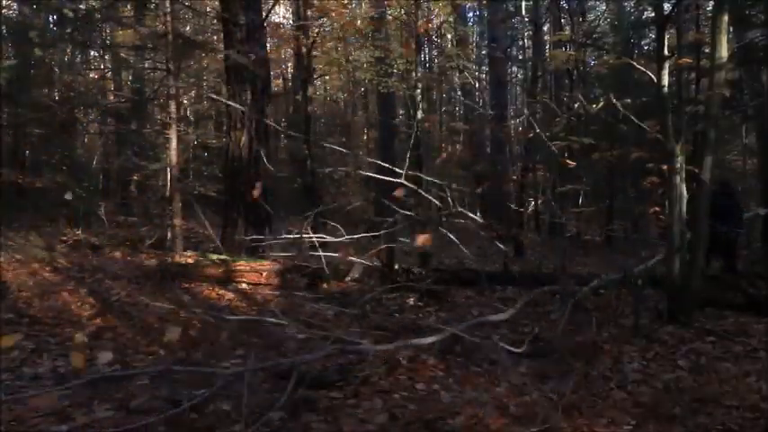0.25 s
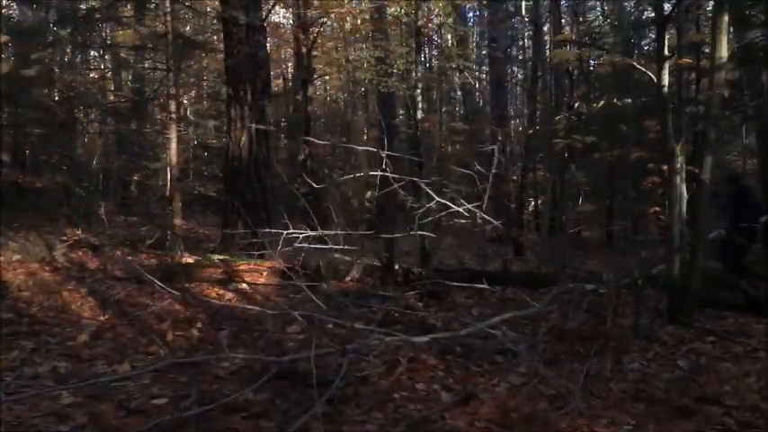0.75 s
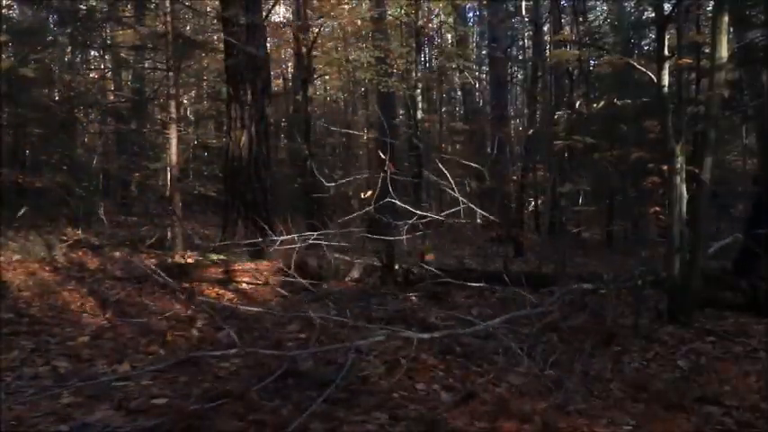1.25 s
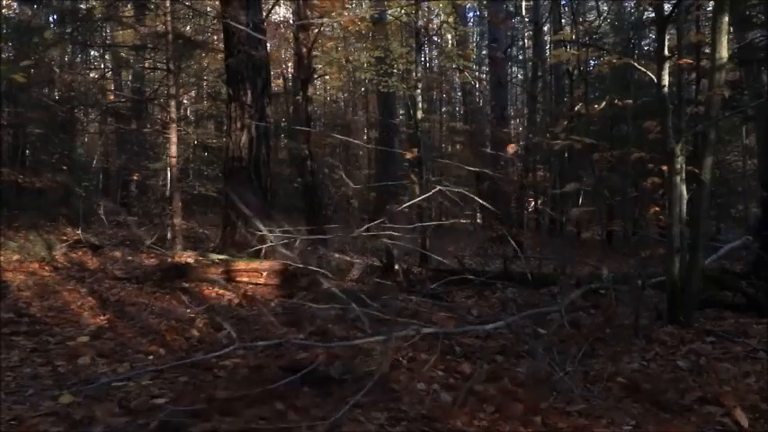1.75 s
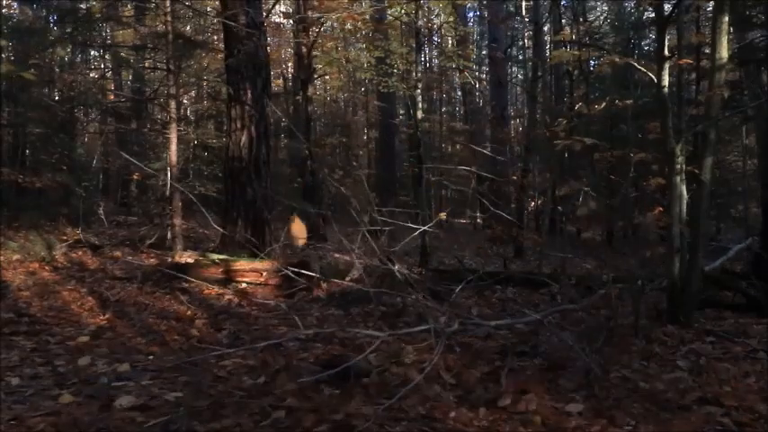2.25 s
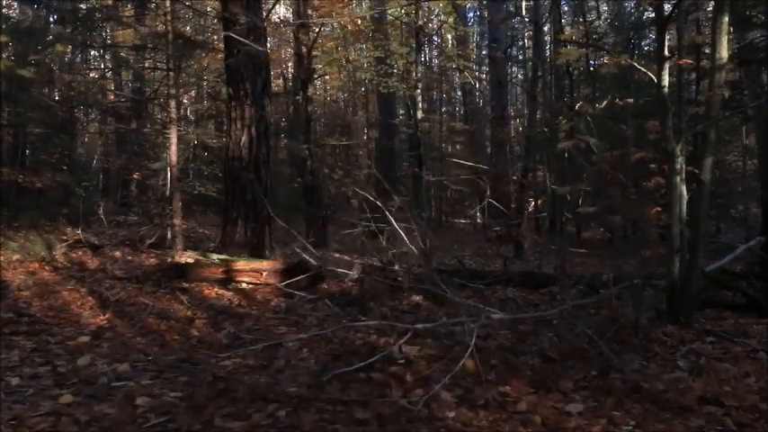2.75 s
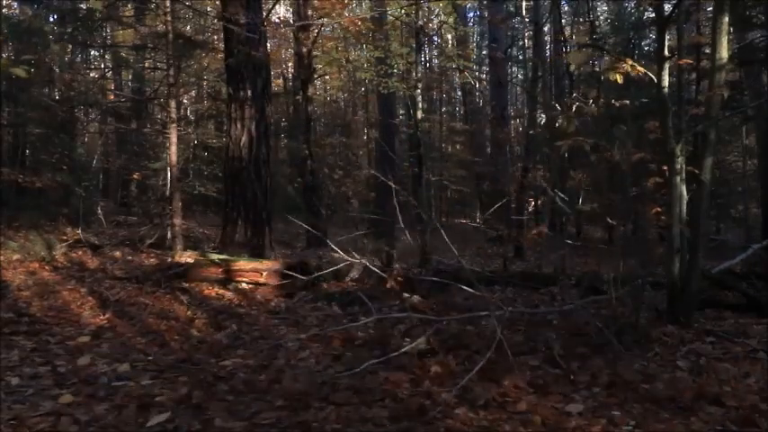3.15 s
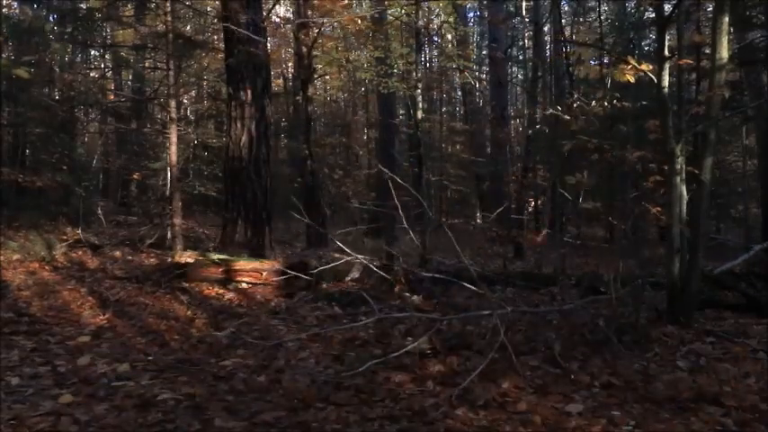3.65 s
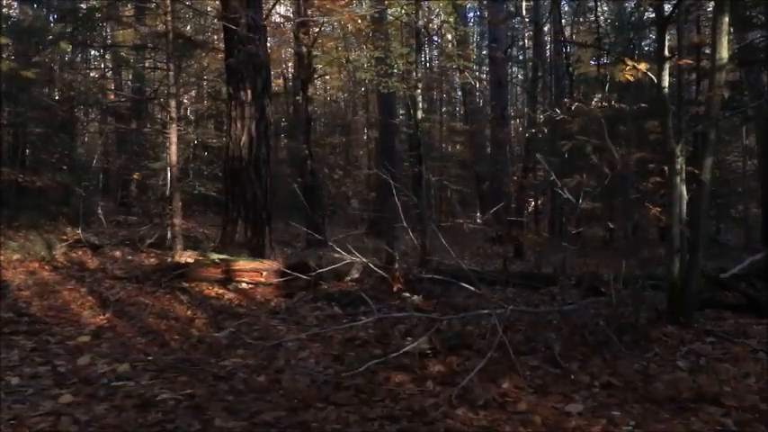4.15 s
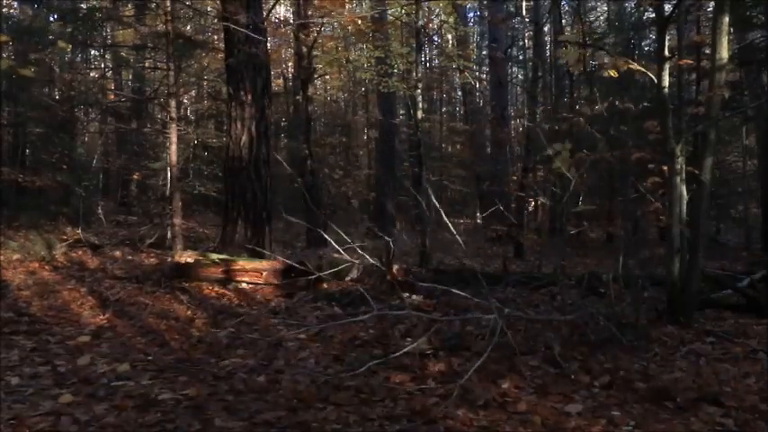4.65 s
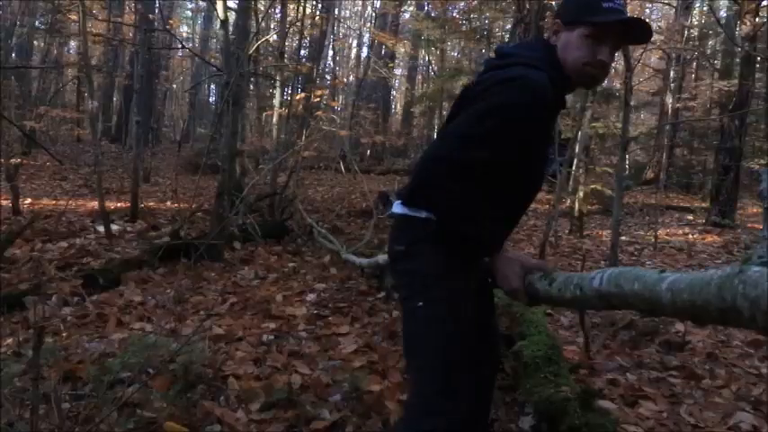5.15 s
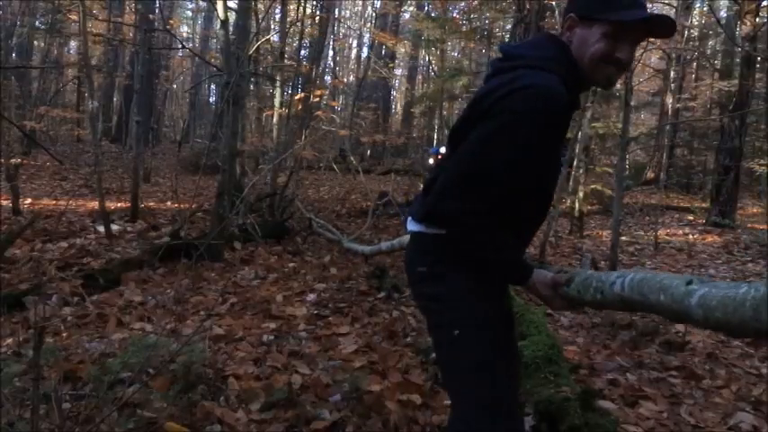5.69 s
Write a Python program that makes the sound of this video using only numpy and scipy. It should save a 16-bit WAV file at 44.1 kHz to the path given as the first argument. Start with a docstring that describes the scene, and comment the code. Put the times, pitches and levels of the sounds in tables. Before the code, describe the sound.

Dense leaf crackle and snapping twigs in a quiet wood fade, a branch crashes down, then close wood squeaks, knocks and snaps.

```python
"""Countless dry leaves crackle under a dragged branch in a quiet wood, with twigs snapping now and then.
After a lull the branch crashes into the litter and settles; then a log close by creaks, knocks and cracks.
Leaves are random clicks over filtered hiss, snaps are noise bursts through stick resonances, creaks are
stick-slip pulses through log modes, and thuds are decaying noise bands. Trunks echo the wood sounds faintly,
over a far murmur of filtered noise. Both channels carry the same mono sound."""
import sys
import numpy as np
from scipy import signal
from scipy.fft import rfft, irfft
from scipy.io import wavfile
from scipy.ndimage import uniform_filter1d

SR = 44100
rng = np.random.default_rng(int(sys.argv[2]) if len(sys.argv) > 2 else 0)


def log_audio(samples):
    """Write samples as a 16-bit WAV file to the path given in sys.argv[1]."""
    # one column per channel
    frames = np.atleast_2d(samples).T
    # limit to full scale, then quantise
    limited = np.clip(frames, -1, 1)
    pcm = np.round(limited * 32767).astype(np.int16)
    wavfile.write(sys.argv[1], SR, pcm)


N = 261072
T = np.arange(N) / SR  # time axis [s]
TOP_HZ = 15900  # upper limit of the sound and of the stick modes

# How hard the dragged branch stirs the litter, before the leaf trim: (time [s], level [dB])
DRAG_LEVEL = [(0, -41.5), (0.12, -43.5), (0.53, -39.5), (0.66, -41.5), (0.79, -46.5), (0.98, -52.0),
              (1.12, -47.5), (1.6, -46.0), (1.92, -40), (2.3, -46.5), (2.44, -43.5), (2.8, -46.0),
              (2.95, -42.5), (3.26, -45), (3.42, -52), (3.62, -58), (3.95, -63), (4.2, -57.5)]


def undb(db):
    """Decibels to gain."""
    return 10 ** (np.asarray(db) / 20)


def unit(x):
    """Scale to rms 1."""
    return x / np.sqrt(np.mean(x ** 2))


def level_curve(table):
    """Draw a (time [s], level [dB]) table as a level signal in dB."""
    times_s, levels_db = np.transpose(table)
    return np.interp(T, times_s, levels_db)


def add(out, start_s, x):
    """Mix x into out from the given time."""
    i = int(start_s * SR)
    out[i:i + len(x)] += x[:N - i]


def butter(x, hz, kind, order=2):
    """Low-, high- or band-pass, with corners kept safely below half the sample rate."""
    corners_hz = np.minimum(hz, SR / 2 - 1000)
    return signal.sosfilt(signal.butter(order, corners_hz, kind, fs=SR, output="sos"), x)


def ring(x, hz, width_hz):
    """One resonance, gain 1 at its centre."""
    return signal.lfilter(*signal.iirpeak(hz, hz / width_hz, fs=SR), x)


def colour(x, points, size=8192):
    """Causal minimum-phase filter with the given (Hz, dB) shape that keeps the power of white noise."""
    hz, db = np.transpose(points)
    bins_hz = np.arange(size // 2 + 1) * SR / size
    gain = unit(undb(np.interp(np.log(bins_hz + 1), np.log(hz), db)))
    # folding the cepstrum forward in time makes the filter causal
    cepstrum = irfft(np.log(gain))
    cepstrum[1:size // 2] *= 2
    cepstrum[size // 2 + 1:] = 0
    impulse = irfft(np.exp(rfft(cepstrum)))
    return signal.fftconvolve(x, impulse)[:len(x)]


def walk(rate_hz):
    """Smooth random wander with rms 1."""
    hold = int(SR / rate_hz)
    steps = np.repeat(rng.standard_normal(N // hold + 1), hold)
    return unit(uniform_filter1d(steps, hold)[:N])


def air():
    """The far murmur of the wood: coloured noise, swelling a little."""
    # Spectrum of the murmur: (frequency [Hz], relative density [dB])
    air_colour = [(12, -26), (20, -10.5), (68, -18.5), (101, -2), (127, -7.5), (158, -3), (193, -6.5),
                  (513, -7), (1480, -8.5), (1610, -14), (2260, -12), (2460, -14), (8650, -25.5),
                  (16000, -45)]
    level_db = -62 + 0.82 * walk(3.52)
    return colour(rng.standard_normal(N), air_colour) * undb(level_db)


def trunks(x, t60_s=0.99, dull_hz=4500, size=33000):
    """Trees scatter sound into a dull echo: convolution with decaying, low-passed noise of unit energy."""
    decay = np.exp(-np.log(1000) * T[:size] / t60_s)
    echo = butter(rng.standard_normal(size), dull_hz, "lowpass", order=1) * decay
    return signal.fftconvolve(x, echo / np.sqrt(np.sum(echo ** 2)))[:N]


def crackle(rate, spread_db, patchy_db, hiss_db, crisp_db, bands=9):
    """Tiny leaf fractures (rate per second) of random size over sliding hiss, each band wavering by itself."""
    size_db = spread_db * np.minimum(rng.exponential(size=N), 4)
    clicks = (rng.random(N) < rate / SR) * undb(size_db)
    edges_hz = np.geomspace(50, 18000, bands + 1)
    out = 0
    for low_hz, high_hz in zip(edges_hz, edges_hz[1:]):
        # more hiss per octave down: fractures stand out in the treble and merge lower down
        band_hiss_db = hiss_db - crisp_db * np.log2(high_hz / edges_hz[-1])
        hiss = undb(band_hiss_db) * rng.standard_normal(N)
        fractures = unit(clicks * rng.standard_normal(N))
        grains = unit(fractures + hiss)
        out = out + butter(grains, (low_hz, high_hz), "bandpass") * undb(patchy_db * walk(60))
    return unit(out) * undb(0.41 * walk(45))


def dragged_leaves(trim_db=-0.97):
    """The branch sweeps the litter and comes to rest: crackle follows the strength of the drag."""
    # Spectrum of sliding leaves: (frequency [Hz], relative density [dB])
    drag_colour = [(35, -55), (60, -18), (103, -7.5), (238, -2), (371, -1.5), (480, -1.5), (785, -2),
                   (1820, 0.5), (2650, -0.5), (5210, -1), (6580, -4.5), (8510, -1.5), (10300, -8.5),
                   (13300, -6.5), (16000, -19.5)]
    rustle = crackle(rate=1800, spread_db=4.0, patchy_db=0.73, hiss_db=4.5, crisp_db=1.5)
    fade_out = np.interp(T, [3.6, 4.6], [1, 0])
    return colour(rustle, drag_colour) * undb(level_curve(DRAG_LEVEL) + trim_db) * fade_out


def crushed_leaves(stir_trim_db=-2):
    """Weight crushes leaves in quick swells that die away, while the litter goes on ticking as it settles."""
    # Spectrum of crushed leaves: (frequency [Hz], relative density [dB])
    crash_colour = [(60, -11), (110, -12.5), (300, -10), (700, -9), (1300, -6.5), (2000, -7.5), (2600, -9),
                    (5000, -7.5), (6500, -10.5), (8300, -8), (10000, -14), (13500, -15), (16000, -24)]
    # Stirring after the crash and under the shifting log, before the trim: (time [s], level [dB])
    stir_level = [(4.7, -56), (4.94, -55), (5.06, -56.5), (5.42, -55.5), (5.54, -58.5), (5.69, -71.5),
                  (5.84, -56.5), (5.9, -61)]
    # Weight coming down: (time of peak [s], level [dB], attack [s], decay time constant [s])
    crush_events = [(4.273, -39, 0.017, 0.14), (4.428, -43.5, 0.027, 0.096), (5.003, -48, 0.027, 0.0036)]
    stir = undb(level_curve(stir_level) + stir_trim_db) * np.interp(T, [4.3, 4.75], [0, 1])
    envelopes = [stir]
    for peak_s, db, attack_s, decay_s in crush_events:
        before = np.minimum(T - peak_s, 0) / attack_s
        after = np.maximum(T - peak_s, 0) / decay_s
        envelopes.append(undb(db) * np.exp(-before ** 2 - after))
    crunch = crackle(rate=1700, spread_db=2.5, patchy_db=2.0, hiss_db=1.5, crisp_db=3.0)
    return colour(crunch, crash_colour) * np.linalg.norm(envelopes, axis=0)  # envelopes sum in power


def thuds(size=32768):
    """Heavy wood knocks on soft ground, which damps each blow to a broad resonance: a decaying noise band."""
    # Dull blows: (time [s], level [dB], pitch [Hz], decay time constant [s])
    blows = [(.4124, -32.5, 560, 0.0012), (3.0773, -31.5, 724, 0.0012), (4.411, -49, 160, 0.018),
             (4.425, -55.5, 111, .04), (4.50, -72, 30, 0.18), (5.113, -63, 110, .025),
             (5.188, -62.5, 158, 0.085), (5.327, -41, 910, 0.0036), (5.328, -42.5, 440, 0.0062)]
    out, t = np.zeros(N), T[:size]
    for start_s, db, hz, decay_s in blows:
        burst = rng.standard_normal(size) * np.exp(-t / decay_s)
        blow = butter(burst, [hz * .65, hz * 1.6], "bandpass", order=3)
        add(out, start_s, undb(db) * blow / np.sqrt(np.sum(blow ** 2) / (decay_s * SR)))
    return out


def log_creaks(direct=0.12, dull_hz=2600, damp_s=0.032, size=6000):
    """Bark sticks and slips at a sagging, uneven rate, rings the log's modes and grinds on as it rests."""
    # Modes of the log: (frequency [Hz], width [Hz], gain [dB])
    log_modes = [(365, 37, -3), (520, 40, -15), (632, 12, 10.5), (710, 8.5, 10), (828, 12, 8.5),
                 (1035, 27, 7.5), (1080, 23, -5), (1333, 23, -4.5), (1370, 11, -1), (1923, 20, -1),
                 (2400, 54, -12), (2500, 61, -20)]
    # Slips on bark: (time [s], length [s], level [dB], first slip rate [Hz], roughness [0-1])
    slip_events = [(5.01, 0.022, -38.5, 1158, 0.42), (5.083, 0.025, -42, 1390, 0.6),
                   (5.293, 0.016, -55, 690, 0.7), (5.717, 0.035, -50.5, 1404, 0.37),
                   (5.751, 0.028, -45, 1120, 0.7), (5.805, 0.017, -51.5, 745, 0.7)]
    sag_per_s = 2.5
    attack_s, release_s = 0.0026, 0.0062  # how quickly a slip starts and sticks again
    grind_db, grind_s, grind_hz = -11, 0.046, (212, 750)  # level against the creak, decay, band
    out, t = np.zeros(N), T[:size]
    for start_s, length_s, db, first_hz, rough in slip_events:
        jitter, grit, grind = rng.standard_normal((3, size))
        rate_hz = first_hz * np.exp(-sag_per_s * t) * (1 + rough * jitter)
        phase = np.cumsum(rate_hz) / SR
        # one pulse per slip, less the steady drift
        slips = unit(np.diff(np.floor(phase), prepend=0) - np.gradient(phase))
        press = np.clip(np.minimum(t / attack_s, (length_s - t) / release_s), 0, 1)
        # quick slips hardly move the modes below their own rate
        push = butter(press * ((1 - rough) * slips + rough * grit), 0.55 * first_hz, "highpass")
        modes = sum(undb(gain_db) * ring(push, hz, width_hz) for hz, width_hz, gain_db in log_modes)
        creak = direct * butter(push, [300, 1400], "bandpass") + modes
        # once the log sticks again the ground damps it
        after = np.maximum(t - length_s, 0)
        creak = butter(creak, dull_hz, "lowpass", order=6) * np.exp(-after / damp_s)
        creak = creak / np.sqrt(np.sum(creak ** 2) / (length_s * SR))
        grind = unit(butter(grind, grind_hz, "bandpass"))
        grind = grind * np.minimum(t / length_s, 1) * np.exp(-after / grind_s)
        add(out, start_s, undb(db) * (creak + undb(grind_db) * grind))
    return out


def twiglets(start_s=0.11, end_s=3.3, bright_hz=14000, break_ms=0.64, tail_db=-12):
    """Thin twigs give way by chance under the drag, louder when it pulls harder; rows like snap_events."""
    per_s, above_drag_db, spread_db, pitch_hz = 5.5, 9, 1, (2980, 11500)
    count = int(per_s * (end_s - start_s))
    when, pitch, strength = rng.random((count, 3)).T
    times_s = start_s + (end_s - start_s) * when
    drag_db = np.interp(times_s, *np.transpose(DRAG_LEVEL))
    levels_db = drag_db + above_drag_db + spread_db * (2 * strength - 1)
    pitches_hz = np.interp(pitch, [0, 1], pitch_hz)
    return [(*row, bright_hz, break_ms, tail_db) for row in zip(times_s, levels_db, pitches_hz)]


def twigs(tail_s=0.0029, body_s=0.0082, body=0.58, stick_q=8, trim_db=-6, size=4096):
    """A snap is a sharp release, a quick tearing of fibres, then splinters over the duller ring of the stick."""
    # Spectrum of a breaking twig: (frequency [Hz], relative density [dB])
    twig_colour = [(120, -27), (260, -24), (450, -9.5), (900, -14), (1700, -0.5), (2400, 0.5), (3800, 1),
                   (5000, 1.5), (6400, -6.5), (8100, 5), (9200, 0), (13000, -1.5), (16000, -3)]
    # Snaps before the trim: (time [s], level [dB], stick pitch [Hz], brightness [Hz],
    # time scale of the break [ms], splinter tail [dB])
    snap_events = [(.4101, -20.5, 600, 15100, 0.81, 9), (.4123, -12, 583, 15000, .7, -14),
                   (.4985, -25, 1560, 4500, 3, -5), (.5268, -28.5, 1200, 9000, 2.6, -18),
                   (.558, -29, 6500, 15000, 1, -5), (.631, -26.5, 5000, 15000, 0.86, -18),
                   (.694, -31.5, 1210, 5000, 0.92, -11), (1.873, -28, 905, 4500, .91, 4),
                   (1.914, -33, 1850, 7040, 1.6, 0), (2.007, -30, 9350, 15000, 1.8, -12),
                   (2.694, -25.5, 8400, 15000, 0.44, -14), (3.0682, -29.5, 3600, 9000, 1.9, -16),
                   (3.077, -22, 690, 1500, .25, -24), (3.151, -31, 8000, 15000, 0.9, -14),
                   (4.2635, -23, 1720, 2500, 2.3, -16), (4.2667, -18, 720, 14000, 0.71, -7),
                   (4.3035, -24.5, 1990, 5030, 3.3, -3), (4.401, -29.5, 1090, 1380, .8, 5),
                   (4.426, -22.5, 3600, 9200, 1.05, -10), (5.029, -38, 6000, 10000, .5, -17),
                   (5.05, -40, 5100, 9000, .58, -11), (5.0925, -36.5, 7000, 14000, .89, -25),
                   (5.469, -32, 3550, 9000, .3, 2), (5.4777, -13.5, 873, 8400, 0.45, -9),
                   (5.846, -44.5, 1750, 3000, 5, -2)]
    # Bending modes of a stick: (multiple of its pitch [ratio], gain [linear])
    stick_modes = [(1, 0.96), (2.76, 0.41), (5.4, 0.98), (8.9, 0.49)]
    out, t = np.zeros(N), T[:size]
    for start_s, db, pitch_hz, bright_hz, break_ms, tail_db in [*snap_events, *twiglets()]:
        fibres, splinters, stick = rng.standard_normal((3, size))
        age = 1000 * t / break_ms
        tearing = .22 * fibres * age * np.exp(-1.5 * age)
        tearing[0] -= 1 / (1 + break_ms)  # the release: a slow break has a weaker first click
        tail = 0.14 * splinters * np.exp(-t / tail_s)
        tail = tail + body * butter(stick, 1000, "lowpass") * np.exp(-t / body_s)
        snap = colour(tearing + undb(tail_db) * tail, twig_colour)
        # a stick rings in its bending modes and radiates little below the first
        snap = butter(snap, .6 * pitch_hz, "highpass")
        modes = [(ratio * pitch_hz, gain) for ratio, gain in stick_modes if ratio * pitch_hz < TOP_HZ]
        snap = snap + sum(gain * ring(snap, hz, hz / stick_q) for hz, gain in modes)
        snap = butter(snap, bright_hz, "lowpass")
        # the level refers to the loudest millisecond (44 samples)
        loudest_ms = np.sqrt(uniform_filter1d(snap ** 2, size=44, mode="constant").max())
        add(out, start_s, undb(db + trim_db) * snap / loudest_ms)
    return out


def scene():
    """Leaves and wood, the same in both ears; only the distant wood has a noticeable echo."""
    wood = twigs() + log_creaks() + thuds()
    # the echo send drops for the log close by
    echo_db = np.interp(T, [4.9, 5.0], [-17, -32])
    echo = trunks(wood * undb(echo_db))
    mono = air() + echo + dragged_leaves() + crushed_leaves() + wood
    return np.array([mono, mono])


def record(dry):
    """The recorder cuts the top with a steep elliptic low-pass."""
    return signal.sosfilt(signal.ellip(10, .1, 80, TOP_HZ, fs=SR, output="sos"), dry)


dry = scene()
out = record(dry)
log_audio(out)
```